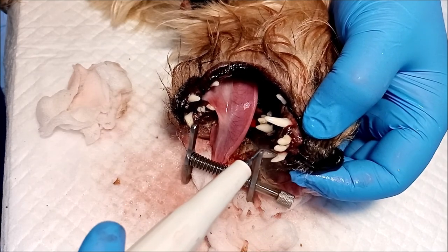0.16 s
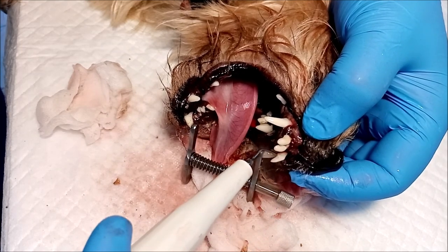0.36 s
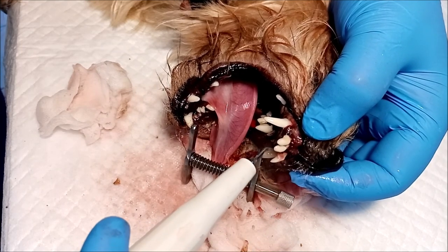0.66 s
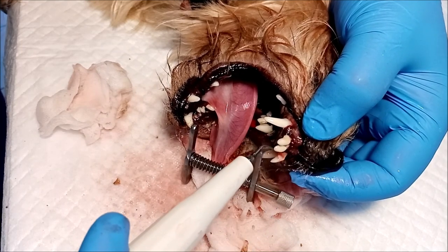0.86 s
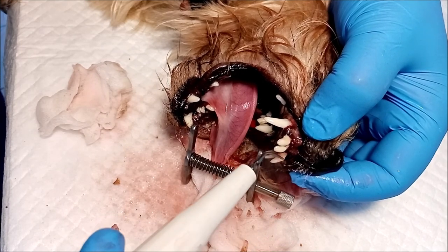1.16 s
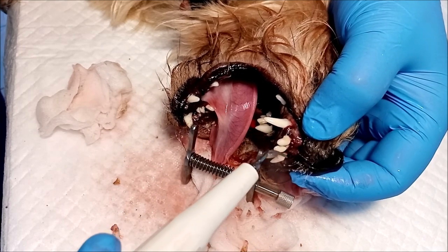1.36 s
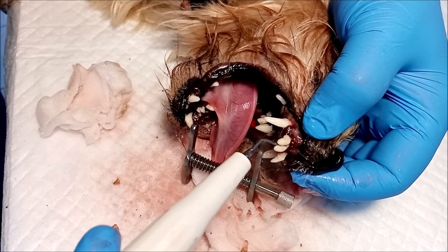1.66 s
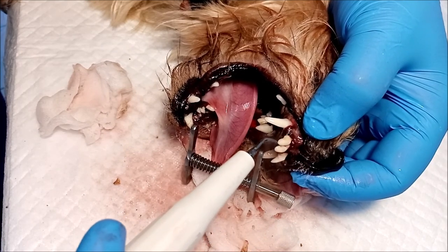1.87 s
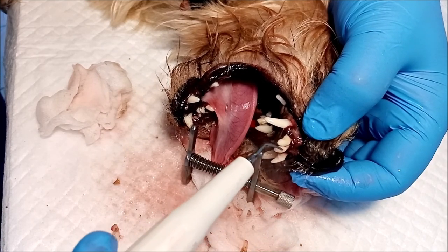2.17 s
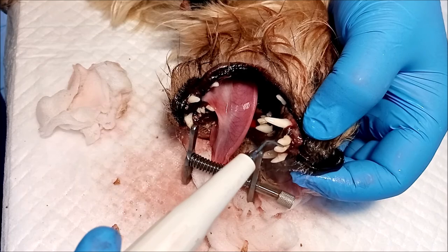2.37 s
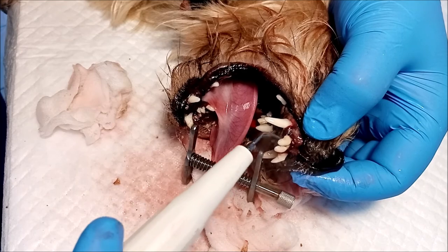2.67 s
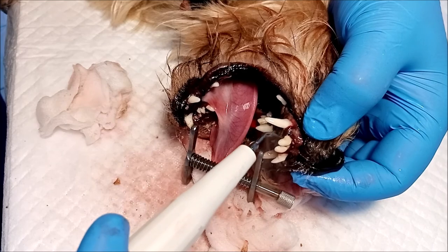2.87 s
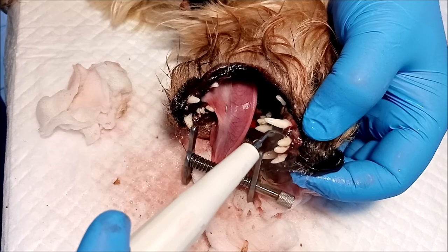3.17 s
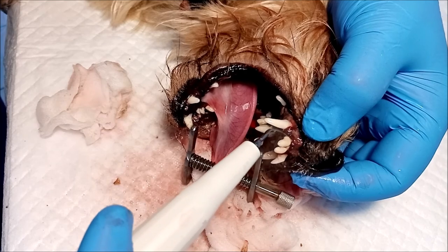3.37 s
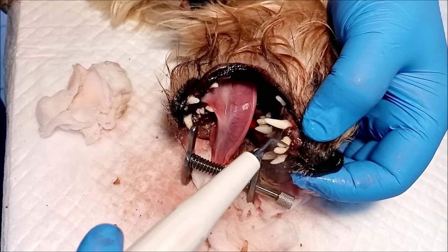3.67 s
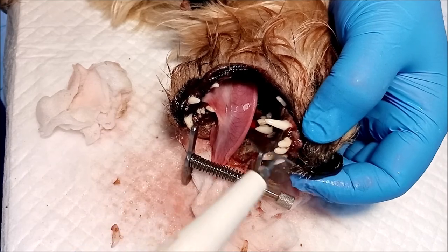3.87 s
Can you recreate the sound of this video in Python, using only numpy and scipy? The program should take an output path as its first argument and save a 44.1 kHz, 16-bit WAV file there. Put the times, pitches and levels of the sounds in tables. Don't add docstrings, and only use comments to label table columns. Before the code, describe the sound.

A thin, rough ultrasonic scaler whine skitters over scratchy hiss and crackle as a dog's teeth are cleaned, then cuts off abruptly.

```python
import sys
import numpy as np
from scipy import signal
from scipy.fft import rfft, irfft, next_fast_len
from scipy.io import wavfile
from scipy.ndimage import uniform_filter1d

SR = 44100
rng = np.random.default_rng(int(sys.argv[2]) if len(sys.argv) > 2 else 0)


def how_loud(loudness_db):
    steps = np.asarray(loudness_db, float) / 20
    return 10 ** steps


def digitize_waveform(pressure):
    field = np.atleast_2d(pressure).T
    bounded = np.clip(field, -1, 1)
    quanta = np.round(bounded * 32767).astype(np.int16)
    wavfile.write(sys.argv[1], SR, quanta)


N = 177634
TIME = np.arange(N) / SR


def rms_one(x):
    return x / np.sqrt(np.mean(np.abs(x) ** 2, axis=-1, keepdims=True) + 1e-20)


def in_time(rows):
    s, *columns = np.transpose(rows)
    return [np.interp(TIME, s, c) for c in columns]


def coloured(x, points):
    hz, level_db = np.transpose(points)
    size = next_fast_len(N)
    grid = np.maximum(np.fft.rfftfreq(size, 1 / SR), 1)
    gain = how_loud(np.interp(np.log(grid), np.log(hz), level_db, left=-60, right=-60))
    return rms_one(irfft(rfft(x, size) * gain, size)[..., :N])


def drift(rate_hz, channels=1):
    r = np.exp(-2 * np.pi * rate_hz / SR)
    settling = SR // 4
    white = rng.standard_normal((channels, N + settling))
    return rms_one(signal.lfilter([1], [1, -2 * r, r * r], white)[:, settling:])


def narrow(centre_hz, width_hz, channels):
    phase = 2 * np.pi * np.cumsum(centre_hz * np.ones(N)) / SR
    in_phase = drift(width_hz, channels=channels) * np.cos(phase)
    quadrature = drift(width_hz, channels=channels) * np.sin(phase)
    return in_phase + quadrature


def patchy(points, patchy_db, rate_hz, count=22):
    size = next_fast_len(N)
    white = rfft(coloured(rng.standard_normal((2, N)), points), size)
    edges_hz = np.geomspace(points[0][0], points[-1][0], count + 1)
    band = np.digitize(np.fft.rfftfreq(size, 1 / SR), edges_hz)
    out = np.zeros((2, N))
    for k in range(1, count + 1):
        sway = drift(rate_hz, channels=2)
        gain = how_loud(patchy_db * (sway - .5 * np.abs(sway)))
        out += irfft(white * (band == k), size)[:, :N] * gain
    return rms_one(out)


def clicks(per_s, spread_db, upward):
    born = rng.random((2, N)) < per_s / SR
    sizes = how_loud(spread_db * np.minimum(rng.exponential(1, (2, N)), 5))
    return born * sizes * np.where(rng.random((2, N)) < upward, 1, -1)


def at_microphones(shared, own, likeness):
    right_lag_s = .000665
    late = np.interp(np.arange(N) - right_lag_s * SR, np.arange(N), shared)
    likeness = np.clip(likeness, 0, 1)
    return np.sqrt(likeness) * np.array([shared, late]) + np.sqrt(1 - likeness) * own


# (frequency [Hz], density [dB per Hz])
ROOM_SPECTRUM = [(60, -9), (200, -1), (600, 4), (1300, -3), (2000, -21), (6000, -18), (15000, -5)]


def room():
    opening = np.clip((TIME - 3.955) / 0.038, .12, 1)
    return how_loud(-71 + 3.5) * coloured(rng.standard_normal((2, N)), ROOM_SPECTRUM) * opening


# (frequency [Hz], density [dB per Hz])
RUMBLE_SPECTRUM = [(25, -21), (60, -6), (110, 1), (200, 2), (300, -6), (500, -25)]


def rumble():
    running = np.clip((3.93 - TIME) / 0.018, .1, 1)
    lumps = how_loud(-77.5 + 4 * drift(6, channels=2) + np.array([[5], [-6]]))
    scrape_share = 0.59
    lumps = lumps * how_loud(scrape_share * (scrape_db()[0] + 63) * [[1], [.2]])
    return coloured(rng.standard_normal((2, N)), RUMBLE_SPECTRUM) * lumps * running


def valve():
    since = TIME - 3.906
    decay = how_loud(-61 - 60 * np.abs(since) / 0.37)
    return decay * (since > 0) * narrow(1200, width_hz=190, channels=2)


# (time [s], peak level [dB])
KNOCKS = [
    (3.826, -56),
    (3.8712, -50),
    (3.895, -46.5),
]


def knocks():
    hits = np.zeros(N)
    for s, peak_db in KNOCKS:
        hits[round(s * SR)] = how_loud(peak_db + 7.5)
    t = np.arange(1500) / SR
    bump = np.sin(2 * np.pi * 110 * t + 1.55) * np.exp(-t / 0.004) * np.minimum(t / 0.0013, 1)
    return np.convolve(hits, bump)[:N] * how_loud([[0], [-14.0]])


# (time [s], peak level [dB], ring
# frequency [Hz], left-right difference [dB])
SNAPS = [(1.052, -42, 7800, 5), (1.707, -31.5, 8360, 1), (2.2861, -41, 7640, 18), (2.322, -35.5, 7780, 9),
         (2.636, -39, 3910, 9.5), (2.697, -38.5, 8610, -15), (3.11, -43, 8700, 1.5), (3.756, -36, 7670, 5),
         (3.7908, -39.5, 8310, -8), (3.825, -53, 7710, -7), (3.7914, -42.5, 3010, 10),
         (3.909, -43, 10600, -5), (1.2094, -45, 8400, 4)]


def snaps():
    out, t = np.zeros((2, N)), np.arange(600) / SR
    swell = t / 0.0023 * np.exp(1 - t / 0.0026)
    for s, peak_db, ring_hz, pan_db in SNAPS:
        at = round(s * SR)
        ring = np.sin(2 * np.pi * ring_hz * t + [[0], [2.5]])
        ring = ring + 0.33 * rng.standard_normal((2, 600))
        level = how_loud(peak_db - 5.5 + pan_db * np.array([[.5], [-.5]]))
        out[:, at:at + 600] += level * swell * ring
    return out


def strokes_db(rows, rise, fall, rest_db, axis):
    t, table = np.arange(0, N + 32, 32) / SR, np.array(rows)
    s, end = table[:, :1], table[:, :1] + table[:, 1:2]
    level_db = table[:, axis, None] - rise * np.maximum(s - t, 0) - fall * np.maximum(t - end, 0)
    total_db = 10 * np.log10(np.sum(how_loud(level_db) ** 2, axis=0) + how_loud(rest_db) ** 2)
    return np.interp(TIME, t, total_db)


# (time [s], length [s], crackle level [dB], rattle level [dB])
SCRAPES = [(0.0, 0.0019, -49, -52), (0.075, 0.071, -58.5, -52), (0.196, 0.024, -50, -47.5),
           (0.34, 0.025, -50.5, -45.5), (0.43, 0.021, -53.5, -46), (0.453, 0.047, -49.0, -53.5),
           (0.526, 0.13, -59.5, -64), (0.631, 0.14, -61, -54.5), (1.05, 0.0061, -48.5, -52.5),
           (1.083, 0.075, -65.5, -60), (1.22, 0.042, -52.5, -49), (1.407, 0.19, -82, -57),
           (1.603, 0.021, -54, -50), (1.7, 0.17, -74, -58.5), (1.9, 0.17, -48, -51),
           (2.098, 0.002, -46.5, -55), (2.214, 0.0086, -62, -53.5), (2.303, 0.074, -68, -56),
           (2.396, 0.13, -47.5, -51), (2.634, 0.102, -57.5, -56.5), (2.725, 0.073, -71, -54.5),
           (2.842, 0.099, -52, -49.5), (2.984, 0.027, -55.5, -52.5), (3.129, 0.042, -49.0, -49),
           (3.191, 0.11, -64.5, -52.5), (3.33, 0.0094, -53.5, -46), (3.382, 0.028, -56.5, -54.5),
           (3.458, 0.016, -45, -46.5), (3.509, 0.16, -61, -52), (3.704, 0.11, -60.5, -56)]


def scrape_db():
    return (strokes_db(SCRAPES, rise=528, fall=636, rest_db=-67, axis=2),
            strokes_db(SCRAPES, rise=528, fall=395, rest_db=-65, axis=3))


# (time [s], length [s], left level [dB], right level [dB])
CONTACTS = [(0.0, 0.065, -47.5, -54), (0.073, 0.14, -47.5, -48.5), (0.188, 0.12, -70.5, -52),
            (0.335, 0.04, -57, -48.5), (0.4, 0.084, -68, -51), (0.427, 0.07, -51.0, -52.5),
            (0.51, 0.12, -79, -59.5), (0.619, 0.034, -54, -50.5), (0.694, 0.068, -57.5, -54.5),
            (1.05, 0.022, -46, -47), (1.211, 0.048, -55, -50.5), (1.257, 0.068, -66.5, -58.5),
            (1.443, 0.188, -46, -49), (1.615, 0.061, -62, -54), (1.696, 0.054, -41, -47),
            (1.757, 0.11, -46, -50), (1.922, 0.041, -44.5, -46.5), (2.0, 0.114, -47.5, -48.5),
            (2.214, 0.005, -53.5, -61), (2.281, 0.26, -48.5, -48), (2.636, 0.033, -60, -52.0),
            (2.69, 0.12, -46, -49.5), (2.821, 0.11, -52, -49.5), (2.982, 0.027, -53, -49.5),
            (3.114, 0.054, -51.5, -46.5), (3.186, 0.15, -70, -48.5), (3.378, 0.046, -61, -50),
            (3.44, 0.048, -48.5, -46), (3.474, 0.31, -77, -50), (3.909, 0.0018, -53, -50.5)]


def contact_db():
    return np.array([strokes_db(CONTACTS, rise=1800, fall=807, rest_db=-68.5, axis=2),
                     strokes_db(CONTACTS, rise=1800, fall=260, rest_db=-62, axis=3)])


# (time [s], rattle level [dB], crackle level [dB])
TURN = [(0.0, -54, -67), (0.23, -55.5, -72.5), (0.46, -55.5, -62.5), (0.69, -59.5, -72.5),
        (0.92, -54.5, -62), (1.16, -59, -75), (1.39, -52.5, -62), (1.62, -52, -58.5), (1.85, -51.5, -62),
        (2.08, -53.5, -61.5), (2.31, -55, -64), (2.54, -55.5, -66.5), (2.77, -47.5, -52.5),
        (3.01, -49, -57.5), (3.24, -62, -73.5), (3.47, -57.5, -61.5), (3.7, -58.0, -75.5), (3.93, -54, -63)]


def turn_db():
    return in_time(TURN)


# (frequency [Hz], density [dB per Hz])
CRACKLE_SPECTRUM = [(45, -26.5), (105, -5.5), (200, -4), (600, -5.5), (1100, -8), (3000, -17), (8000, -22),
                    (12000, -65)]


def crackle():
    left_db, drag_db = scrape_db()
    right_db = turn_db()[1] + 0.25 * (drag_db + 45)
    level = how_loud(np.array([left_db, right_db]) + 2.9)
    per_s = 2500 * how_loud(4.0 * drift(70, channels=2))
    pops = coloured(clicks(per_s, spread_db=3.5, upward=.7), CRACKLE_SPECTRUM)
    running = np.clip((3.925 - TIME) / .015, 0, 1)
    return level * pops * running


# (frequency [Hz], density [dB per Hz])
RATTLE_SPECTRUM = [(1500, -7.5), (2600, -8.5), (3600, -3.5), (5000, -3.5), (6300, -6), (7000, -7.5),
                   (9500, -6), (11000, -18)]
# (time [s], centre frequency [Hz], level re rattle [dB])
GAP = [(0.0, 4210, -7), (0.38, 3970, -8.5), (0.5, 4250, -9), (0.82, 4520, -4), (0.9, 4010, -17),
       (1.05, 4340, -1.5), (1.4, 4000, -14), (2.02, 3850, -13), (2.25, 4050, -4), (2.79, 4077, -6),
       (2.85, 3730, -4.5), (3.05, 4110, -15), (3.16, 4084, -3.5), (3.25, 3760, 1), (3.36, 4460, -7),
       (3.54, 3913, -6), (3.62, 4260, -7), (4.03, 4200, -32)]


def rattle():
    left_db = scrape_db()[1]
    right_db = turn_db()[0] + 0.43 * (contact_db()[1] + 50) + 0.26 * (left_db + 49.5)
    level = how_loud(np.array([left_db, right_db]) + 2.0)
    gap_hz, gap_db = in_time(GAP)
    grit = coloured(clicks(7600, spread_db=1.5, upward=.5), RATTLE_SPECTRUM)
    spray = patchy(RATTLE_SPECTRUM, patchy_db=6.5, rate_hz=11)
    hump = how_loud(-20.5) * narrow(4187, width_hz=1100, channels=3)
    whistle_hz = gap_hz + 150 * drift(25.04)[0]
    hump = hump + how_loud(gap_db) * narrow(whistle_hz, width_hz=230, channels=3)
    hump = at_microphones(hump[0], hump[1:], 0.43)
    return level * rms_one((0.47 * grit + 1.17 * spray + hump) * how_loud(2.0 * drift(43)))


# (time [s], frequency [Hz], spray level [dB])
BOUNCE = [(0, 8050, -0.5), (.2, 8300, 0.5), (.33, 8550, 0.5), (.39, 8850, 1.5), (.43, 8450, 0),
          (.61, 8720, 1.5), (.79, 8150, 2), (1.04, 8250, -1), (1.2, 8400, -2), (1.23, 8650, 0.5),
          (1.3, 8350, 0), (1.44, 8680, -1), (1.589, 8250, 0), (1.755, 8400, 0.5), (1.8, 8150, 0),
          (1.92, 8420, 0.5), (2.05, 8250, -0.5), (2.28, 7800, 0.5), (2.35, 8000, -1), (2.38, 8300, 0),
          (2.72, 8200, -1.5), (2.85, 8000, -1.5), (2.97, 8530, -1), (3.11, 8540, 0.5), (3.36, 9200, 1),
          (3.43, 8130, -2.5), (3.49, 8700, 1), (3.58, 9050, 2.5), (3.69, 9150, 2.5), (3.77, 8200, 0.5)]


def bounce():
    s, *columns = np.transpose(BOUNCE)
    row = np.maximum(np.searchsorted(s, TIME, side="right") - 1, 0)
    settle_s = .008
    return [uniform_filter1d(c[row], max(round(settle_s * SR), 1)) for c in columns]


# (frequency [Hz], width [Hz], level [dB])
TIP_MODES = [
    (7600, 150, -9.0),
    (9200, 400, -8.0),
    (10200, 300, -16.0),
]
# (frequency [Hz], density [dB per Hz])
FIZZ_SPECTRUM = [(9000, -9), (10000, -7), (11500, -8), (12800, -8.5), (14200, -4), (14800, -9.5),
                 (15800, -10)]


def whine():
    bearing_db, (pitch_hz, spray_db) = contact_db(), bounce()
    level = how_loud(bearing_db + 1.17)
    pitch_hz = pitch_hz + 110 * drift(40.2)[0]
    firm = np.clip(level.max(axis=0) / how_loud(-35.5), .15, 1)
    driven = np.clip((3.93 - TIME) / .015, .2, 1)
    line = narrow(pitch_hz, width_hz=236, channels=3)
    tone = driven * how_loud(-1.5 * spray_db) * firm ** 0.17 * line
    tone = tone + how_loud(-8) * narrow(pitch_hz + 150, width_hz=400, channels=3)
    for hz, width_hz, mode_db in TIP_MODES:
        tone = tone + firm * how_loud(mode_db + 3.0 * drift(8.9)) * narrow(hz, width_hz, channels=3)
    lumps = how_loud(2.0 * drift(78) + 0.42 * drift(6))
    tone = rms_one(tone * lumps)
    tone = at_microphones(tone[0], tone[1:], .8)
    fizz = rms_one(patchy(FIZZ_SPECTRUM, patchy_db=8.0, rate_hz=10.5) * lumps ** 0.37)
    fizz_db = np.array([[-58.5], [-56.5]]) + 0.76 * (bearing_db + 50) + spray_db
    return level * tone + how_loud(fizz_db) * fizz


# (time [s], jump [dB])
TOUCHES = [(.331, 2.5), (0.505, -9), (.789, -9), (1.052, 3), (1.088, -4), (1.209, 10), (1.644, -11),
           (1.691, 2), (2.116, -4.5), (2.212, 10), (2.281, 6), (2.634, 8), (3.026, -7.5), (3.113, 2.5),
           (3.801, -7), (3.907, -2)]


def touches():
    gain_db, reach_s = np.zeros(N), 0.022
    for s, jump_db in TOUCHES:
        since = TIME - s
        fade = np.clip(1 - np.abs(since) / reach_s, 0, 1)
        gain_db += .5 * jump_db * np.tanh(since * 1000) * fade
    return how_loud(gain_db)


def scene():
    pedal_s, rundown_db_per_s = 3.929, 195
    rundown = how_loud(-rundown_db_per_s * np.maximum(TIME - pedal_s, 0))
    tip = (whine() + rattle() + crackle()) * touches() * rundown
    return tip + snaps() + rumble() + knocks() + valve() + room()


def top_cut(x):
    return signal.sosfilt(signal.butter(12, 15810, fs=SR, output="sos"), x)


def record(dry):
    low_pass = signal.cheby2(14, 50, 15950, fs=SR, output="sos")
    mix = signal.sosfilt(low_pass, dry)
    return top_cut(mix)


dry = scene()
out = record(dry)
digitize_waveform(out)
```